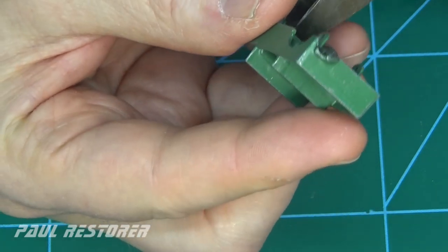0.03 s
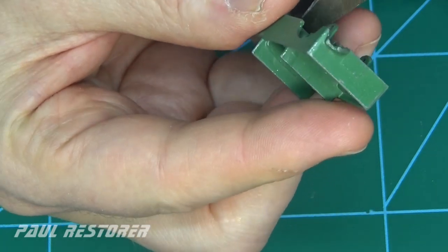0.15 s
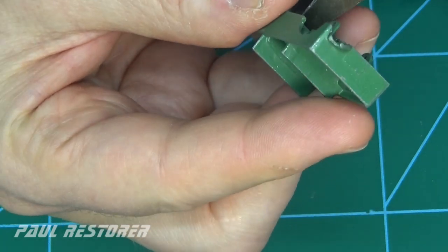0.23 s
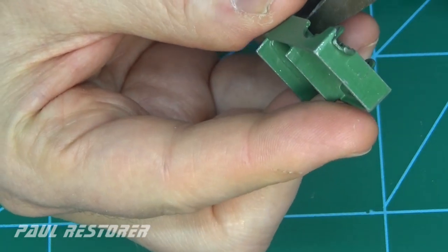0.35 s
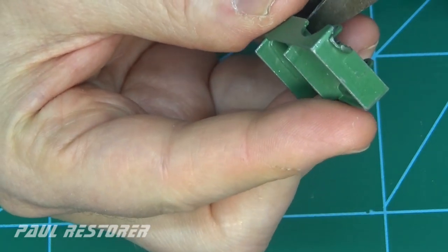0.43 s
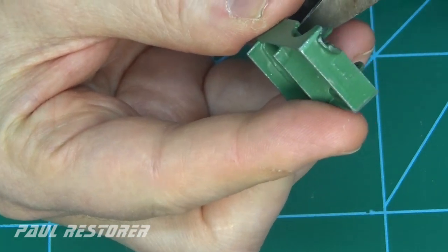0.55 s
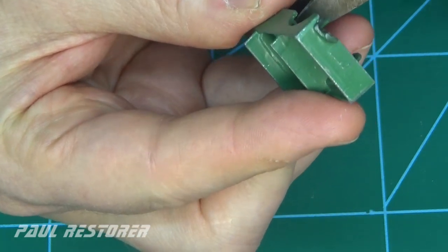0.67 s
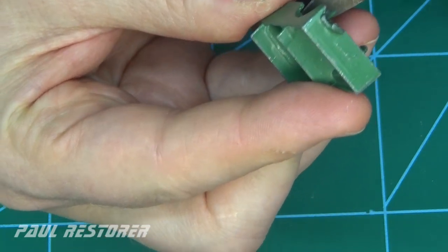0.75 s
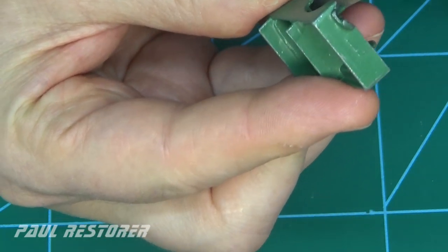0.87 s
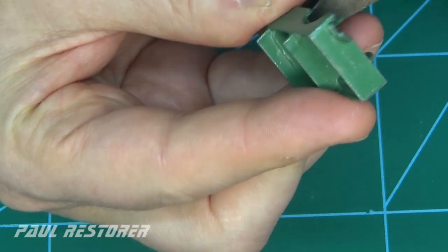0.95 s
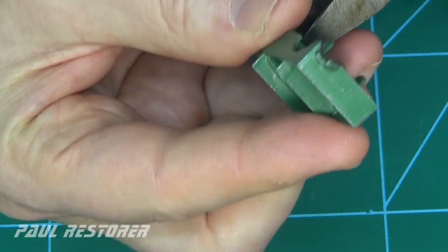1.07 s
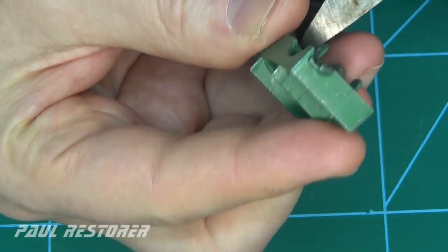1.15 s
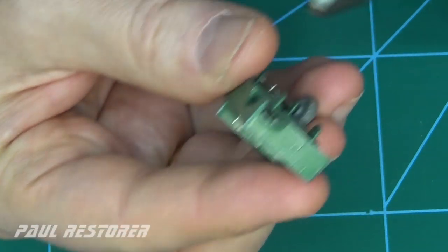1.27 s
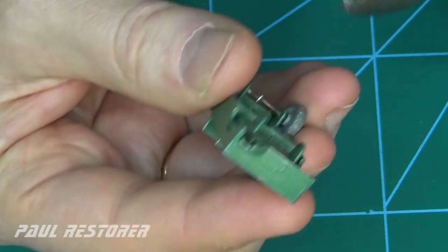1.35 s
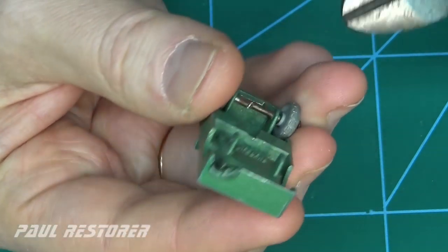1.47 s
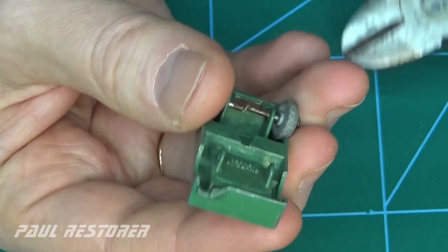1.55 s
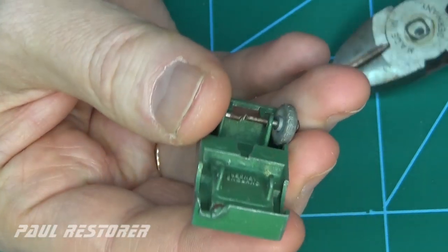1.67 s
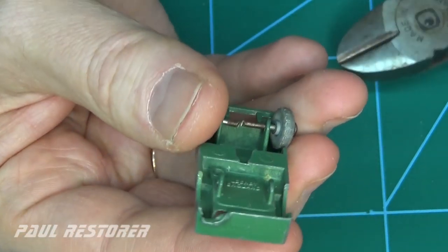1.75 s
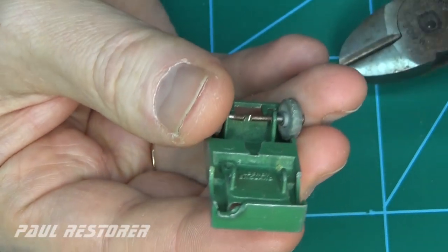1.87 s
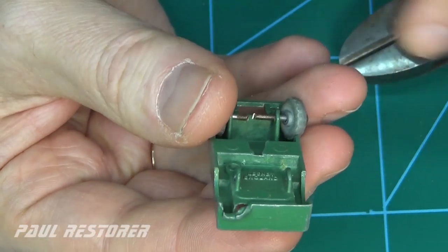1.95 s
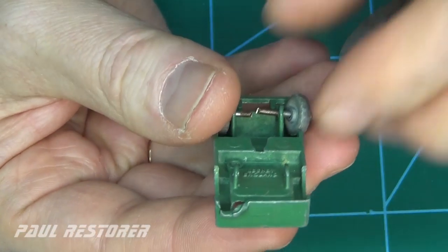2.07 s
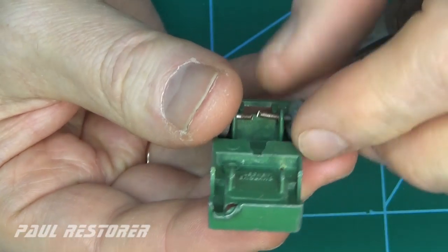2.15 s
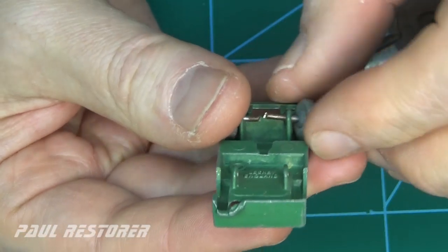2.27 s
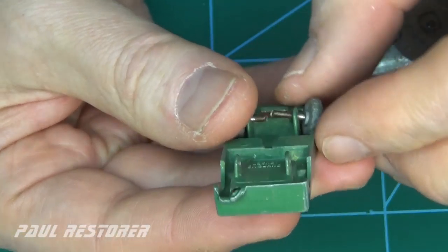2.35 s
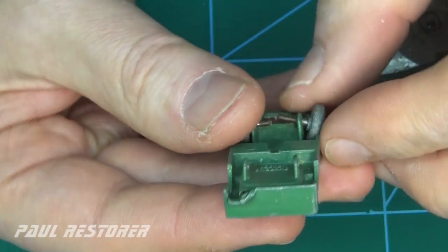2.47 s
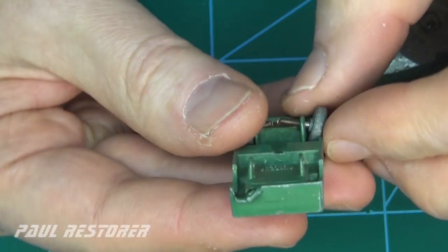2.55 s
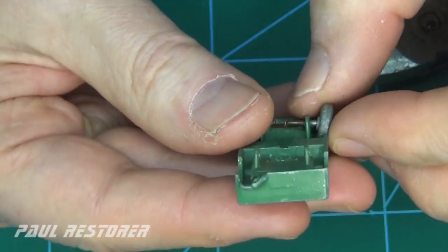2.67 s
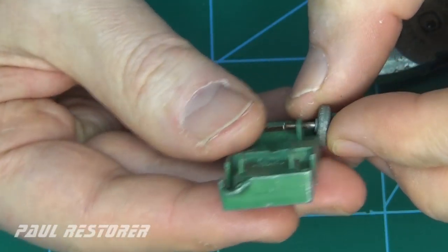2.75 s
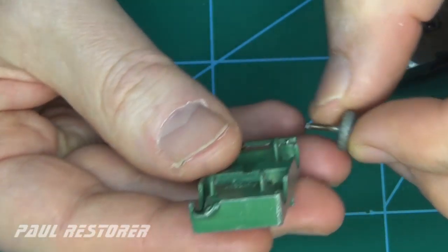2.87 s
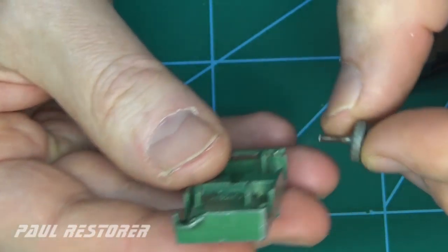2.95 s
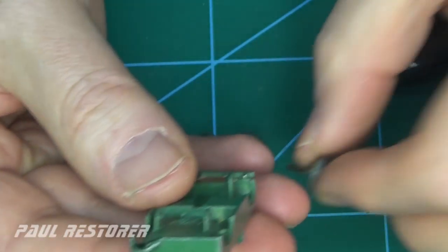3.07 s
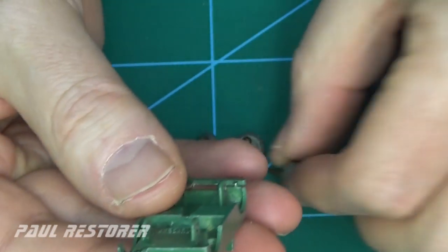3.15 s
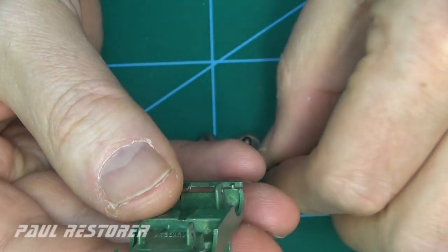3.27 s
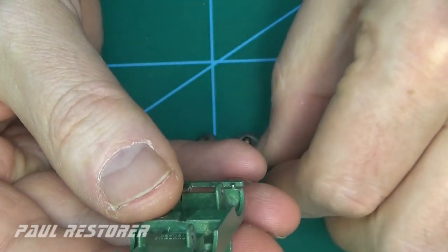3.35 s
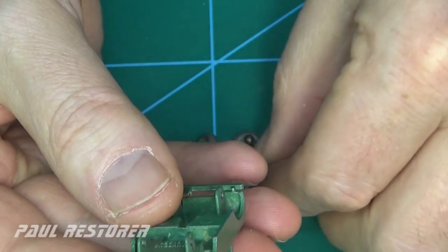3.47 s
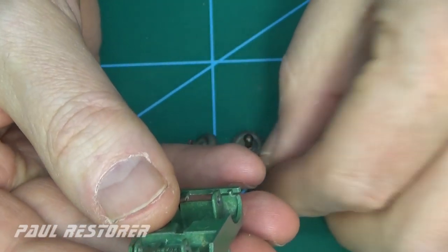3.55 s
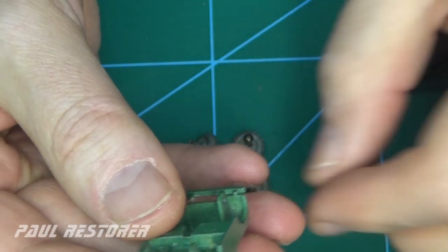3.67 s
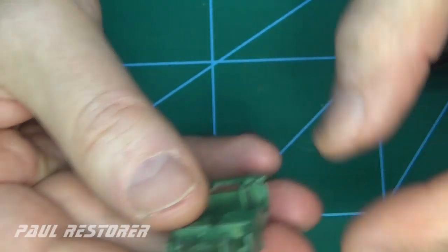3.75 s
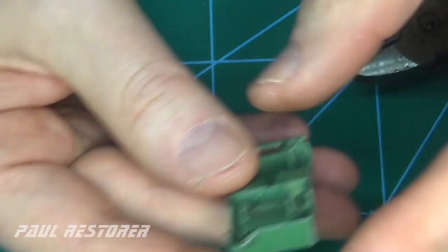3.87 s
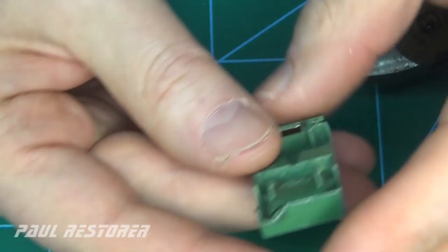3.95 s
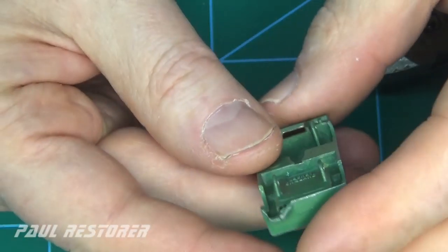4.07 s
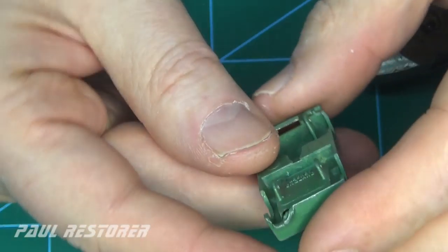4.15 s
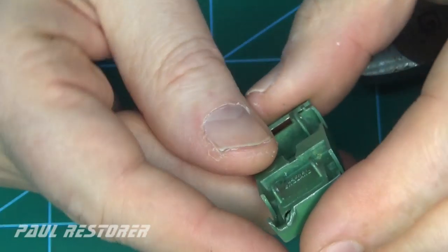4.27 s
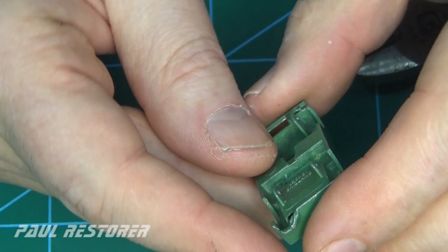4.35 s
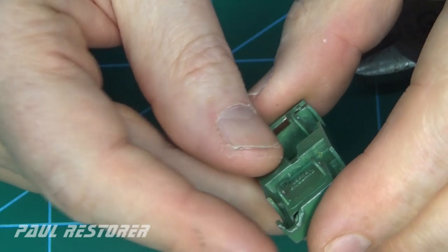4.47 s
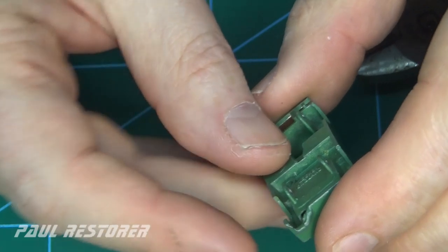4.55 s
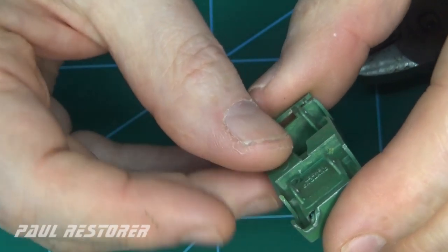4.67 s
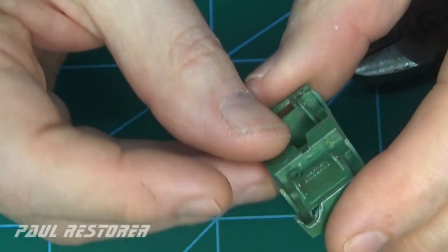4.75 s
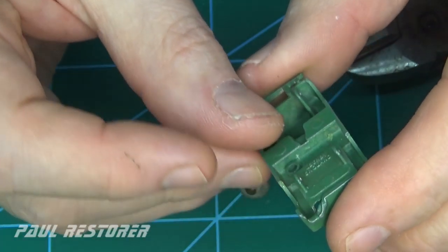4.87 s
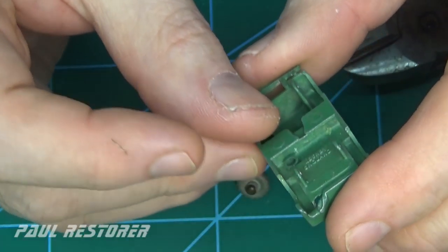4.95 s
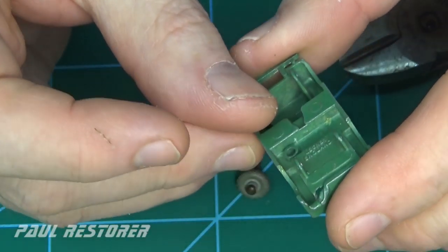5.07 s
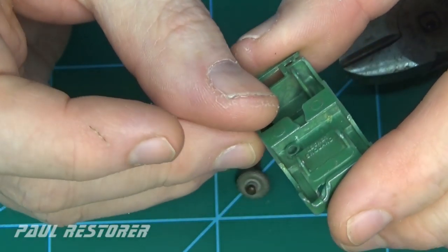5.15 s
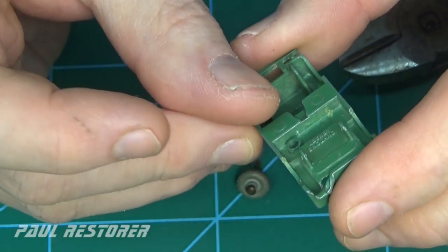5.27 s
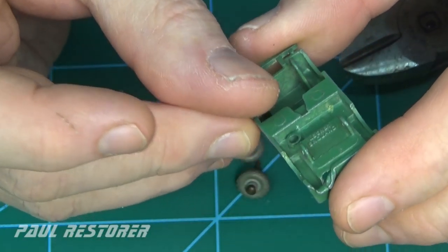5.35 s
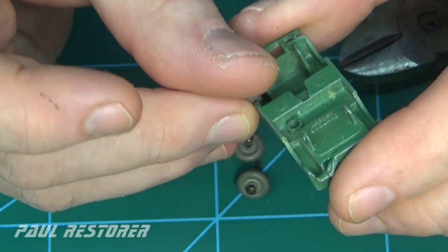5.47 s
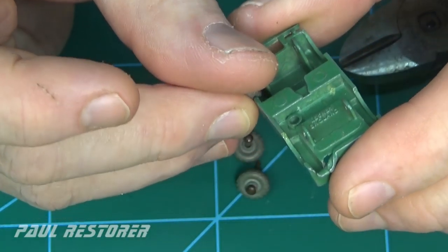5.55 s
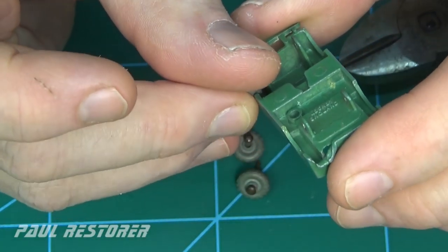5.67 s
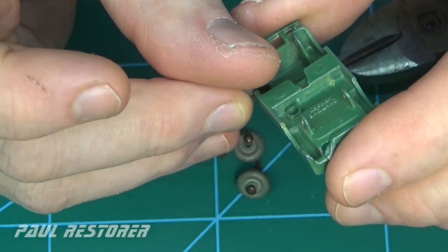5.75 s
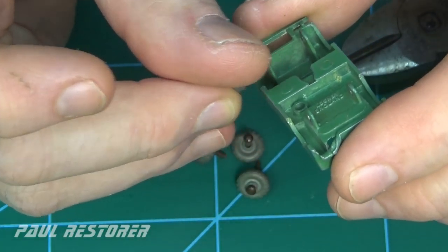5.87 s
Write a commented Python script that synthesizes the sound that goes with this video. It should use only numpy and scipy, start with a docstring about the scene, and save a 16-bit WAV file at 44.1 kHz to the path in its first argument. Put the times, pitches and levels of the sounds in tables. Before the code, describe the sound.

Cutting pliers snap sharply through a small steel axle, then clatter down onto a mat-covered bench, followed by faint finger ticks and a small wheel click.

```python
"""Cutting pliers bite through the steel axle of a die-cast toy car: noise bursts, then thin lines of pitch.
The jaws scrape free; the pliers land on a cutting mat as dull clacks, and the bench modes boom.
Fingers set down a wheel and handle the body: ticks through resonances, rubs of coloured noise.
All is close, in a small, quiet workroom: short decaying-noise reflections, air noise and thin whines.
"""
import sys
import numpy as np
from scipy import signal
from scipy.fft import rfft, irfft, next_fast_len
from scipy.io import wavfile

SR = 44100
rng = np.random.default_rng(int(sys.argv[2]) if len(sys.argv) > 2 else 0)


def dump(signal):
    """Clip the signal to [-1, 1] and save it as 16-bit WAV at the path in sys.argv[1]."""
    limited = np.clip(np.atleast_2d(signal).T, -1, 1)
    pcm = np.round(limited * 32767).astype(np.int16)
    wavfile.write(sys.argv[1], SR, pcm)


N = 260631
TIME = np.arange(N) / SR

# Room tone, broad air: freq_hz, level_db
AIR_SPECTRUM = [(15, -61), (25, -36), (92, 5), (217, -6), (293, 2.5), (384, -7), (714, -2.5), (1260, -12.5),
                (1440, -5), (2220, -14), (2410, -19), (3920, -19.5), (4740, -16), (5430, -20.5),
                (16000, -23)]
# Air resonances: freq_hz, width_hz, level_db
AIR_RESONANCES = [(52.6, 6.4, -70.5), (96.5, 3.1, -68.5), (163.8, 9.2, -71.5), (326, 44, -67.5),
                  (556, 110, -65), (705, 18, -65), (987.5, 73, -63.5), (1453, 13, -72), (1812, 23, -71),
                  (2410, 17, -74), (2690, 70, -75.5), (3180, 47, -97), (7240, 890, -73.5)]
# Air, left minus right: freq_hz, difference_db
AIR_LEFT_RIGHT = [(60, 8.5), (110, -5), (200, -7), (380, -11.5), (700, -4), (1290, 3), (2380, -3),
                  (4400, 0.5), (8120, -1), (15000, 0.5)]
# Air, side against mid: freq_hz, ratio_db
AIR_SIDE = [(60, -50), (150, -12.5), (700, -10), (1500, -6), (4500, -22.5), (8000, -5.5), (15000, -64)]
# Thin steady electrical tones: freq_hz, rms_db
WHINE_TONES = [(13248, -82), (15622, -87)]
# Fingertips brush the casting as the grip shifts: start_s, level_db, rise_s, t60_s
BRUSH_STROKES = [(2.26, -54, 0.011, 0.19), (4.031, -63, 0.061, .6), (5.384, -49.5, 0.024, 0.078)]
# Brush spectrum: freq_hz, level_db
BRUSH_SPECTRUM = [(300, -26), (750, 12), (1300, -15), (3000, 4), (4800, -9), (6500, -8), (16000, -19.5)]
# Skin sliding on paint: start_s, level_db, rise_s, t60_s
PAINT_RUBS = [(2.766, -49.5, 0.083, 0.065), (5.737, -60.5, 0.0075, 0.66), (5.83, -56, 0.043, 0.13)]
# Rub spectrum: freq_hz, level_db
RUB_SPECTRUM = [(2000, -35), (5000, -11.5), (8500, -14), (11500, -29), (12300, 7.5), (13000, -26),
                (14200, -5), (16000, -36)]
# Hand nudges the bench: start_s, level_db, rise_s, t60_s
BENCH_NUDGES = [(2.962, -45.5, 0.095, 0.32), (5.581, -55.5, 0.03, 0.47)]
# Nudge spectrum: freq_hz, level_db
NUDGE_SPECTRUM = [(20, -6), (50, 9), (100, 9), (180, -9), (300, 1.5), (700, -15.5), (2000, -37)]
# Hard steel on steel, with the fracture and the jaws sliding free:
# start_s, level_db, rise_s, t60_s, treble_db, pan_db, lowest_pitch_hz
JAW_CONTACTS = [(.0740, -38, 0.00048, 0.015, 14, 0, 4000), (0.8247, -12, 0.00013, 0.0054, 12, 9, 2450),
                (0.9984, -36, 0.00042, 0.015, 3, 1, 3000), (1.063, -50, 0.00099, 0.28, 5, -1, 2500),
                (1.1991, -35, 0.0054, 0.048, 5.5, 1, 3800), (1.3697, -26, 0.000075, 0.02, 0.5, -2, 1310),
                (5.407, -61, 0.0056, 0.11, -25, 4, 3500)]
# Jaw spectrum: freq_hz, level_db
JAW_SPECTRUM = [(300, -46), (1200, 0), (2300, 4.5), (3300, 2), (4700, 6.5), (6000, 2), (8700, 0),
                (11500, -10.5), (13000, -2), (16000, -16)]
# Clearest ticks of fingers and loose parts on the toy: start_s, level_db, treble_db
CLEAR_TICKS = [(0.16, -49, -20), (0.585, -52.5, -3), (1.882, -52, 3), (2.054, -48.5, -17),
               (2.117, -47, -17), (2.4431, -52.5, 1), (2.485, -48.5, -28), (3.127, -48, -17),
               (3.3552, -48, -9), (3.704, -53.5, -21), (3.953, -51.5, -17), (4.292, -58, -27),
               (4.994, -54, -19), (5.4145, -45, -15), (5.818, -50, -19)]
# Resonances colouring the light ticks, shared with the room: freq_hz, level_db, t60_s
TICK_RESONANCES = [(688, -1.5, 0.036), (1468, -2.5, 0.087), (1800, -5.5, 0.033), (2737, -2.5, 0.028),
                   (3043, -6.5, 0.036), (4800, 3.5, 0.017), (5700, -5, 0.003), (7890, -8, 0.011)]
# Axle yields and cracks, jaws and toy chatter: start_s, level_db, rise_s, t60_s
CUT_CONTACTS = [(0.8087, -35, 0.00059, 0.22), (0.818, -17, 0.0034, 0.0056), (.826, -19, 0.00093, 0.21),
                (0.841, -19.5, 0.0016, 0.13), (.850, -16.5, .005, 0.15), (.866, -23, 0.013, 0.11)]
# Cut spectrum: freq_hz, level_db
CUT_SPECTRUM = [(100, -55), (280, -20), (450, -16), (650, -22), (1100, -22.5), (1650, 2.5), (2200, 0.5),
                (2900, -6.5), (3800, -5), (4800, 5), (6400, -0.5), (8000, 3.5), (11000, -4), (16000, -14)]
# Thin lines of pitch ringing on after the cut: freq_hz, level_db, t60_s
PITCH_LINES = [(1986, -2, .17), (2275, -5, .15), (4420, -7, .17), (4620, -1, .17), (4780, -3, .16),
               (4875, -1, .17), (4960, 0, .17), (5725, -1, .17), (6025, -4, .15), (7020, -4, .16),
               (7590, -2, .17), (7905, -2, .17), (8070, -3, .17), (9135, -3, .17), (9636, -6, .15)]
# Blades meet: start_s, level_db
BLADES_MEET = (.843, -28)
# Cut jolts the bench through the hand: start_s, level_db
BENCH_RECOIL = (.8205, -36.5)
# Handles graze the mat just before landing: start_s, level_db, rise_s, t60_s
HANDLE_GRAZES = [(1.68, -38.5, 0.013, 0.049), (1.776, -26.5, 0.005, 0.13)]
# Pliers land on the mat:
# start_s, clack_db, t60_s, clack_pitch_hz, treble_db, thump_db, upper_modes_db, bench_spot_0_to_1
LANDINGS = [(1.6966, -17, 0.013, 1400, -4.5, -8.5, 2, .26),
            (1.7277, -28.5, 0.0074, 1290, 5, -7.5, -16.5, .26),
            (1.7842, -14.5, 0.022, 1720, 0, -12, 6, .17), (1.8040, -33, 0.091, 1720, 1, -11.5, 3, 0.15),
            (1.8366, -35.5, 0.03, 1640, 8, -19.5, -0.5, .24)]
# Clack spectrum: freq_hz, level_db
CLACK_SPECTRUM = [(40, -42), (150, -14), (500, -2), (800, -1.5), (1050, -5), (1350, -1), (1750, -4.5),
                  (2100, -8.5), (2800, -7.5), (4000, -19.5), (5000, -20.5), (7000, -24), (10000, -30),
                  (16000, -27)]
# Bench modes, the first being the whole top flexing: freq_hz, level_db, t60_s, pan_db
BENCH_MODES = [(93, -1.5, 0.37, 3), (134.7, -6.5, 0.35, 6), (154.4, -3, 0.13, 1), (188, -5, 0.14, -2),
               (215.6, -4, 0.19, -1), (291, 0.5, 0.18, -3.5), (371.6, -9, 0.23, -3), (465.6, 2, 0.13, 1.5)]
# Loose wheel clicks down and settles: start_s, level_db, rise_s, t60_s
WHEEL_DROPS = [(3.425, -28.5, 0.00026, 0.013), (3.4294, -43, 0.00081, 0.11)]
# Wheel, stub of axle and mat: freq_hz, level_db, t60_s
WHEEL_MODES = [(541, -6, 0.19), (1177, -34, 0.077), (1390, -14, 0.11), (1520, -2.5, 0.041),
               (1780, -6, 0.034), (2360, -8, 0.035), (2740, -12.5, 0.017), (3130, -3, 0.0075),
               (3890, -6, 0.015), (4570, -8, 0.0099), (5850, -26, 0.045)]

AIR_MID_DB = -57  # before side noise and balance
HOLD_DB, SLIPS_PER_S, SLIP_SPREAD_DB = -67.5, 68, 7.5
FAINT_NOMINAL_PER_S, FAINT_DB, FAINT_SPREAD_DB = 3, -57, 4
FAINT_TREBLE_DB, FAINT_TREBLE_SPREAD_DB = -11, 13
HAND_PAN_DB = 0.5
JOLT_DB, JOLT_S = -25.5, 0.00087
CLACK_RING_DB, CLACK_RING_T60_S = -9.5, 0.0068
NODE_LOSS_DB = 10.5
ROOM_T60_S, ROOM_DB = 0.089, -16
LOW_CUT_HZ, CUTOFF_HZ = 43, 16000
LEFT_RIGHT_SHARE = np.array([[.5], [-.5]])


def from_db(db):
    """Decibels to gain."""
    return 10 ** (np.asarray(db) / 20)


def unit_energy(x):
    """Scale a response so that it passes white noise at the same level."""
    return x / np.sqrt(np.sum(x ** 2, axis=-1, keepdims=True))


def through(x, response):
    """Convolve a sound with an impulse response."""
    return signal.oaconvolve(np.atleast_2d(x), np.atleast_2d(response), axes=-1)[:, :N]


def panned(x, pan_db):
    """Place a sound by its left-minus-right level."""
    return x * from_db(LEFT_RIGHT_SHARE * pan_db)


def radiated(x, corner_hz):
    """High-pass: the slowest motion is carried poorly."""
    return signal.sosfilt(signal.butter(2, corner_hz, "high", fs=SR, output="sos"), x)


def curve_gain(points, size, share=1):
    """Gain per FFT bin from a freq_hz, level_db curve, interpolated over log frequency."""
    hz, db = np.transpose(points)
    grid_hz = np.maximum(np.fft.rfftfreq(size, 1 / SR), 1)
    return from_db(share * np.interp(np.log(grid_hz), np.log(hz), db))


def coloured(x, spectrum, size=4096):
    """Causal minimum-phase filter, made by folding the cepstrum of a spectrum."""
    cepstrum = irfft(np.log(curve_gain(spectrum, size)))
    cepstrum[1:size // 2] *= 2
    cepstrum[size // 2 + 1:] = 0
    response = irfft(np.exp(rfft(cepstrum)))
    return through(x, unit_energy(response))


def shaded(x, points, share=1):
    """Zero-phase gain on steady noise by a share of a dB curve."""
    size = next_fast_len(N)
    return irfft(rfft(x, size) * curve_gain(points, size, share), size)[..., :N]


def dying(t, t60_s):
    """Exponential decay, 60 dB down after t60_s."""
    return np.exp(-np.log(1000) * t / t60_s)


def mode(hz, t60_s):
    """Damped sine with a starting envelope of 1."""
    t = TIME[:int(2 * t60_s * SR) + 2]
    return np.sin(2 * np.pi * hz * t) * dying(t, t60_s)


def ringing(x, modes):
    """Parallel modes, each passing its own share of a broad excitation."""
    waves = [from_db(db) * unit_energy(mode(hz, t60_s)) for hz, db, t60_s in modes]
    size = max(map(len, waves))
    return through(x, sum(np.pad(wave, (0, size - len(wave))) for wave in waves))


def sum_of_modes(modes):
    """Sum of damped sines, neighbouring modes in opposite sense."""
    out = np.zeros(N)
    for k, (hz, db, t60_s) in enumerate(modes):
        wave = mode(hz, t60_s)
        out[:len(wave)] += (-1) ** k * from_db(db) * wave
    return out


def impulse(start_s, db):
    """One instant push."""
    return from_db(db) * (np.arange(N) == round(start_s * SR))


def contact(start_s, db, rise_s, t60_s, grain_db=2.5):
    """A swarm of micro-impacts of uneven size that swells and dies away."""
    start = int(start_s * SR)
    t = TIME[:min(N - start, int((rise_s + 1.5 * t60_s) * SR))]
    grain_rng = np.random.default_rng(rng.integers(1 << 30))
    grains, sizes = grain_rng.standard_normal((len(t), 2)).T
    grains = grains * from_db(grain_db * sizes)
    envelope = np.minimum(t / rise_s, 1) * dying(np.maximum(t - rise_s, 0), t60_s)
    out = np.zeros(N)
    out[start:start + len(t)] = grains / grains.std() * envelope
    return from_db(db) * out


def brightened(x, treble_db, corner_hz=7500):
    """Tilt about a corner: a harder contact has more treble."""
    low = signal.lfilter(*signal.butter(1, corner_hz, fs=SR), x)
    return low * from_db(-treble_db / 2) + (x - low) * from_db(treble_db / 2)


def room_tone():
    """Steady air noise with resonances, its balance varying with pitch, and a faint electrical whine."""
    mid, side, draught = rng.standard_normal((3, N))
    spread = shaded(side, AIR_SIDE) * [[1], [-1]]
    air = from_db(AIR_MID_DB) * coloured(mid + spread, AIR_SPECTRUM)
    # bandwidth to decay time
    modes = [(hz, db, np.log(1000) / (np.pi * width_hz)) for hz, width_hz, db in AIR_RESONANCES]
    resonances = ringing(draught + spread, modes)
    whine = sum(np.sqrt(2) * from_db(db) * np.sin(2 * np.pi * hz * TIME) for hz, db in WHINE_TONES)
    return shaded(air + resonances, AIR_LEFT_RIGHT, LEFT_RIGHT_SHARE) + whine


def stick_slip(count=1000):
    """Uneven gain: skin catches and lets go."""
    grip = np.clip(rng.standard_normal(count), -2, 2)
    return from_db(SLIP_SPREAD_DB * np.interp(TIME * SLIPS_PER_S, np.arange(count), grip))


def brushes():
    """Soft stick-slip friction of skin on metal, stronger when the grip shifts."""
    hold = from_db(HOLD_DB) * rng.standard_normal(N)
    friction = hold + sum(contact(*row) for row in BRUSH_STROKES)
    return panned(coloured(friction * stick_slip(), BRUSH_SPECTRUM), HAND_PAN_DB)


def fingers(per_s=50, fidget_db=-50, spread_db=3):
    """Skin rubs on paint, the hand nudges the bench, the grip shifts with tiny random ticks."""
    rubs = coloured(sum(contact(*row) for row in PAINT_RUBS), RUB_SPECTRUM)
    nudges = coloured(sum(contact(*row) for row in BENCH_NUDGES), NUDGE_SPECTRUM)
    strength_db = fidget_db + spread_db * np.clip(rng.standard_normal(N), -2, 2)
    fidgets = (rng.random(N) < per_s / SR) * from_db(strength_db)
    return panned(rubs + nudges + ringing(fidgets, TICK_RESONANCES), HAND_PAN_DB)


def jaws():
    """Short, hard scrapes and snaps of steel; each contact has its own lowest pitch."""
    touches = 0
    for start_s, db, rise_s, t60_s, treble_db, pan_db, lowest_hz in JAW_CONTACTS:
        touch = brightened(contact(start_s, db, rise_s, t60_s), treble_db)
        touches = touches + panned(radiated(touch, lowest_hz), pan_db)
    return coloured(touches, JAW_SPECTRUM)


def faint_ticks(count=40):
    """Chance touches at uneven gaps: start_s, level_db, treble_db."""
    gap, strength, hardness = rng.uniform(-0.84, 1, (count, 3)).T
    start_s = np.cumsum(1 + 0.62 * gap) / FAINT_NOMINAL_PER_S
    level_db = FAINT_DB + FAINT_SPREAD_DB * strength
    treble_db = FAINT_TREBLE_DB + FAINT_TREBLE_SPREAD_DB * hardness
    rows = np.transpose([start_s, level_db, treble_db])
    return list(rows[start_s < TIME[-SR // 20]])


def ticks(t60_s=0.027):
    """Light touches, coloured by resonances shared with the room, plus a thin, bright edge."""
    rows = list(CLEAR_TICKS) + faint_ticks()
    touches = sum(contact(start_s, db, 0.00054, t60_s) for start_s, db, _ in rows)
    edges = sum(contact(start_s, db + treble_db, .0005, t60_s) for start_s, db, treble_db in rows)
    return panned(ringing(touches, TICK_RESONANCES) + radiated(edges, corner_hz=7000), HAND_PAN_DB)


def cut(shiver_hz=290):
    """Released jaws chatter against axle and toy; thin pitches ring on and the bench top shivers."""
    chatter = sum(contact(*row, grain_db=3.0) for row in CUT_CONTACTS)
    pitches = through(impulse(*BLADES_MEET), sum_of_modes(PITCH_LINES))
    shiver = through(impulse(*BENCH_RECOIL), sum_of_modes([row[:3] for row in BENCH_MODES]))
    # dull pulse of the recoil
    jolt = through(impulse(BENCH_RECOIL[0], JOLT_DB), np.hanning(int(JOLT_S * SR) + 3))
    return coloured(chatter, CUT_SPECTRUM) + pitches + jolt + radiated(shiver, shiver_hz)


def knocks(rattle_db=-14, rattle_t60_s=0.21, lowest_hz=330, dull_hz=3000):
    """Each landing is a clack dulled by the mat, with a short rattle of the bench after it."""
    out = coloured(sum(contact(*row) for row in HANDLE_GRAZES), CLACK_SPECTRUM)
    for start_s, db, t60_s, hz, treble_db, *_ in LANDINGS:
        clack = contact(start_s, db, 0.0017, t60_s)
        rattle = contact(start_s, db + rattle_db, 0.0027, rattle_t60_s)
        hit = brightened(clack + rattle, treble_db, dull_hz)
        ring = ringing(hit, [(hz, CLACK_RING_DB, CLACK_RING_T60_S)])
        out = out + coloured(hit, CLACK_SPECTRUM) + ring
    return radiated(out, lowest_hz)


def bench(push_s=0.0031, flex_hz=66, upper_hz=150):
    """Landing weight sets the bench top booming; hardness and spot decide which upper modes ring."""
    boom = 0
    for k, (hz, db, t60_s, pan_db) in enumerate(BENCH_MODES):
        blows = 0
        for start_s, *_, thump_db, upper_db, spot in LANDINGS:
            # a mode struck at its node is weaker
            node_db = NODE_LOSS_DB * np.cos((k + 1) * np.pi * spot) ** 2
            blows = blows + impulse(start_s, thump_db + (k > 0) * (upper_db - node_db))
        blows = radiated(blows, upper_hz if k else flex_hz)
        boom = boom + panned(through(blows, from_db(db) * mode(hz, t60_s)), pan_db)
    push = np.hanning(int(push_s * SR) + 3)
    return through(boom, push / push.sum())


def wheel(click_db=-8, lowest_hz=380):
    """A dry click of wheel on mat that rings briefly."""
    touch = sum(contact(*row) for row in WHEEL_DROPS)
    click = from_db(click_db) * coloured(touch, CLACK_SPECTRUM)
    return panned(radiated(ringing(touch, WHEEL_MODES) + click, lowest_hz), HAND_PAN_DB)


def room(x, wall_hz=7000):
    """Dull, quickly dying reflections, different at each ear."""
    t = TIME[:SR // 2]
    tail = rng.standard_normal((2, len(t))) * dying(t, ROOM_T60_S) * (t > .002)
    tail = signal.lfilter(*signal.butter(1, wall_hz, fs=SR), tail)
    return from_db(ROOM_DB) * through(x, unit_energy(tail))


def scene():
    """Handwork with its reflections, plus bench boom and room tone."""
    work = brushes() + fingers() + jaws() + ticks() + cut() + knocks() + wheel()
    return work + room(work) + bench() + room_tone()


def record(dry, top=0.63):
    """Deep bass is rolled off, peaks are rounded and the top is cut."""
    rounded = top * np.tanh(radiated(dry, LOW_CUT_HZ) / top)
    return signal.sosfilt(signal.ellip(12, .1, 80, CUTOFF_HZ, fs=SR, output="sos"), rounded)


dry = scene()
out = record(dry)
dump(out)
```